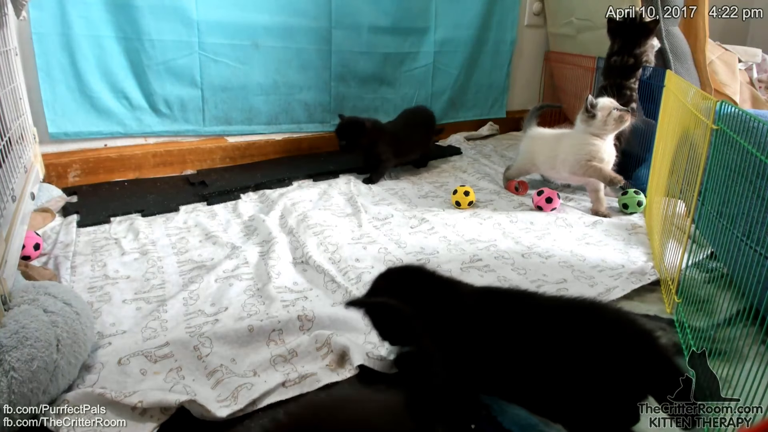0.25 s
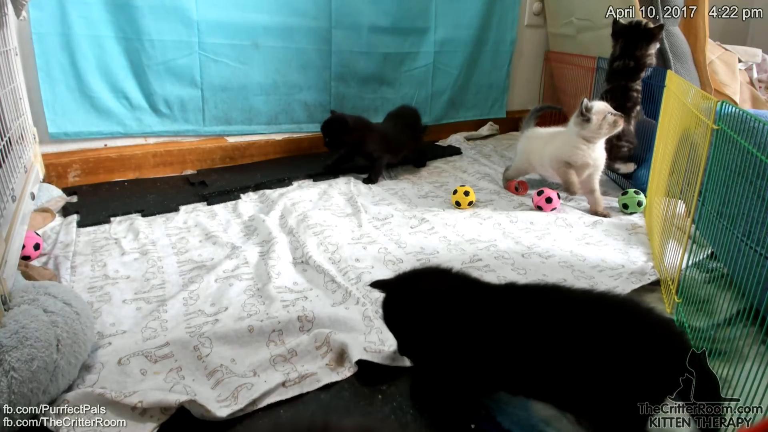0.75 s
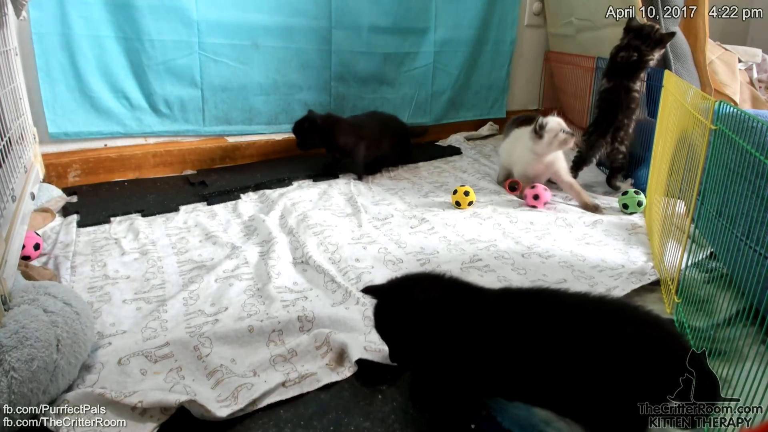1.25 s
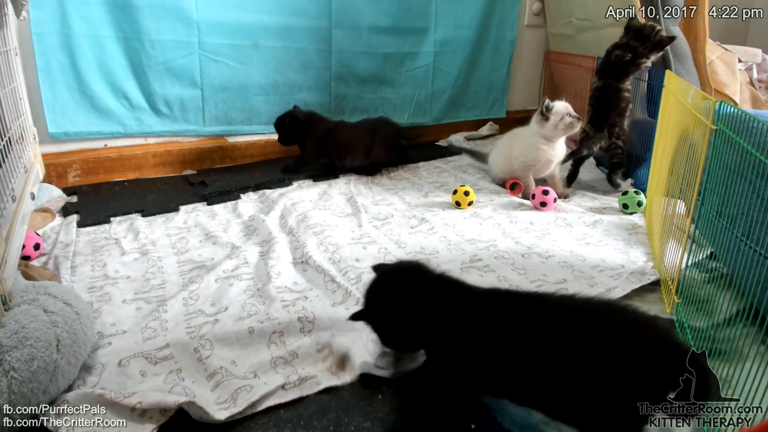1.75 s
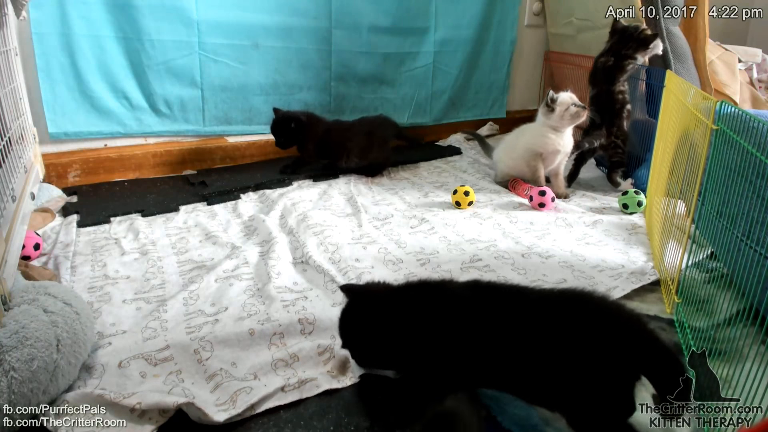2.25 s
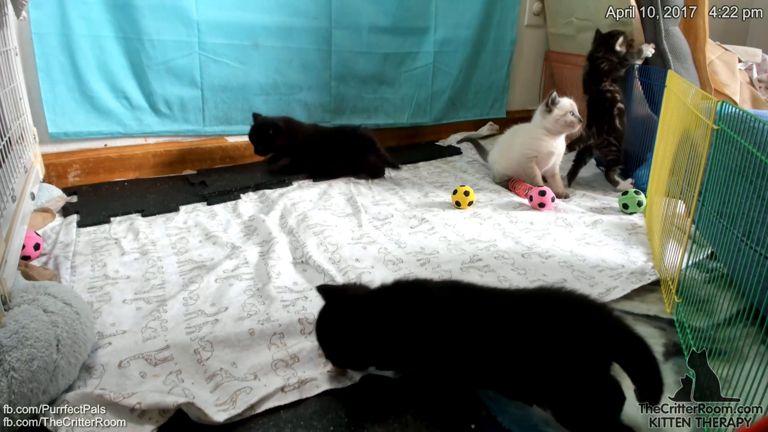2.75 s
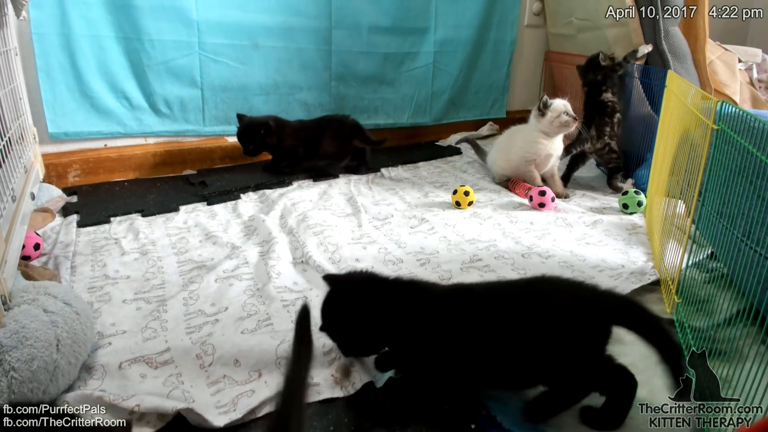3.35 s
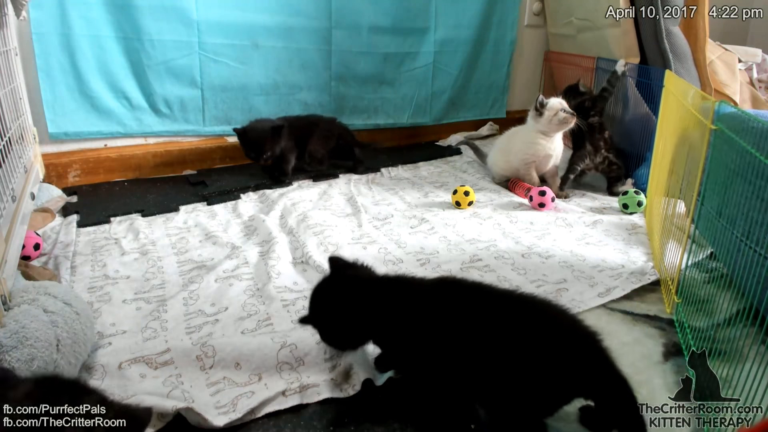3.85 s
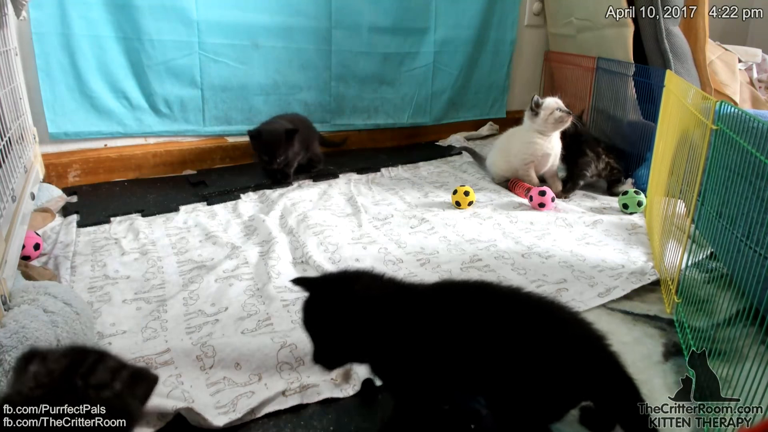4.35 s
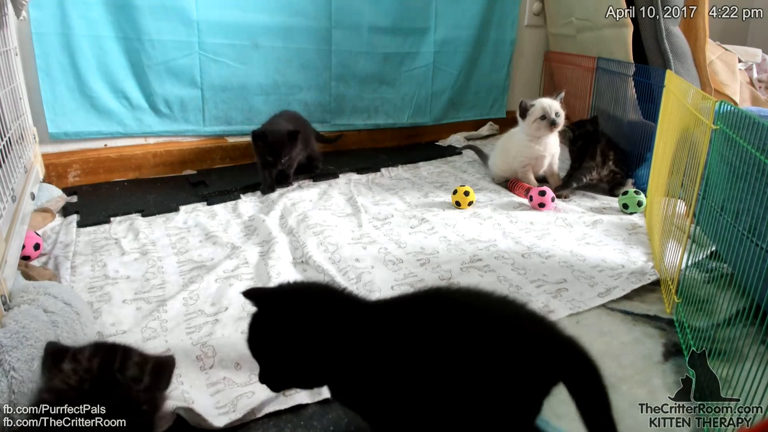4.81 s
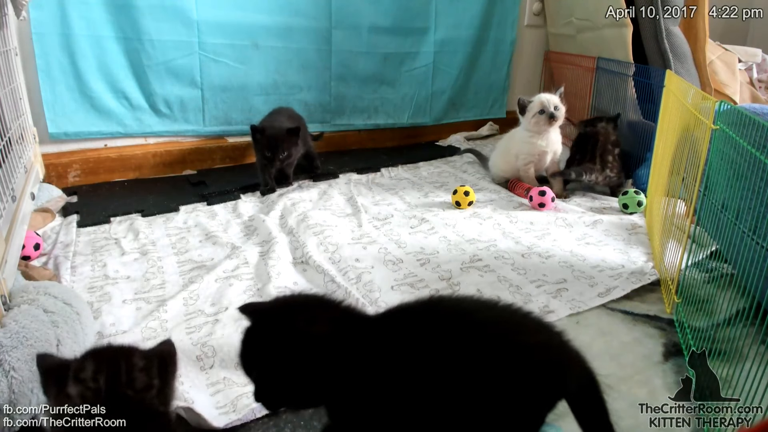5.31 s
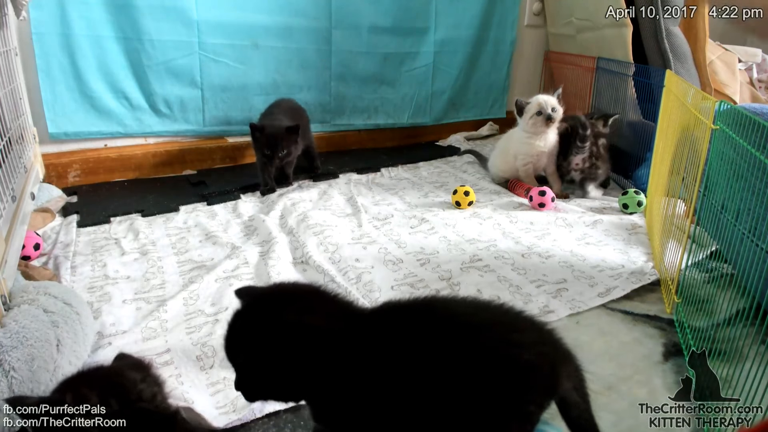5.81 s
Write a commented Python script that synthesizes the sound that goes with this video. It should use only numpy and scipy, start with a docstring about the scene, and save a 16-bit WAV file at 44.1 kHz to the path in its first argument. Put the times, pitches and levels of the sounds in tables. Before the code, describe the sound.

Kittens move about on a blanket over foam floor mats in a small room, heard close from floor level. Soft pats lead to one heavy, boomy thud before the first second ends. Crisp claw ticks follow around two and three seconds, then thumps and cloth scuffles crowd together before thinning to sparse steps. Low hum, rumble and light hiss continue underneath.

```python
"""Kittens pad and scuffle on a blanket over foam mats in a small room, close to a microphone on the floor.
Over a hum, rumble and hiss, soft pats lead to the heaviest thud near 0.8 s: damped swings that ring the boards.
Sharp claw ticks, at 2.2 and 3.1 s, and rasps are resonant noise; cloth and fur drag as swelling bands of noise.
Pats and thuds crowd from 3.2 to 4.9 s, a faint whirr comes up at 4.5 s, and sparser steps last to the end.
A widener spreads the one channel by a near quarter-cycle lag, a crossed echo and a bass shared by both sides."""
import sys
import numpy as np
from scipy import signal
from scipy.fft import rfft, irfft, next_fast_len
from scipy.io import wavfile
from scipy.ndimage import uniform_filter1d

SR = 44100
rng = np.random.default_rng(int(sys.argv[2]) if len(sys.argv) > 2 else 0)


def waveform_to_disk(signal):
    """Save audio, clipped to [-1, 1], as 16-bit WAV at the path in sys.argv[1]."""
    frames = np.transpose(np.atleast_2d(signal))
    scaled = np.clip(frames, -1, 1) * 32767
    samples = np.round(scaled).astype(np.int16)
    wavfile.write(sys.argv[1], SR, samples)


N = 267731


def undb(db):
    """Logarithmic level: 20 dB is a factor of ten in amplitude."""
    return 10 ** (np.asarray(db) / 20)


def level(x, db):
    """Root-mean-square level: scale the whole signal to it."""
    return x * undb(db) / np.sqrt(np.mean(x ** 2))


def band(x, hz, width):
    """Simple resonance: a two-pole filter with gain 1 at its centre."""
    return signal.lfilter(*signal.iirpeak(hz, hz / width, fs=SR), x)


def steep_band(x, hz, width):
    """Cascaded resonance: two equal passes steepen the skirts."""
    return band(band(x, hz, width), hz, width)


def body(force, modes):
    """Modal superposition: neighbouring modes have opposite signs, so the valleys between them stay dark."""
    out = 0
    for k, (hz, width, db) in enumerate(modes):
        sign = (-1) ** k
        out = out + sign * undb(db) * steep_band(force, hz, width)
    return out


def add(out, s, db, x):
    """Linear superposition: lay a sound with the given peak level into the track."""
    i = int(s * SR)
    x = x[:N - i]
    out[i:i + len(x)] += undb(db) * x / np.abs(x).max()


def walk(rate):
    """Random modulation: levels held for 1 / rate seconds, then smoothed twice over that time."""
    hold = int(SR / rate)
    steps = np.repeat(rng.standard_normal(N // hold + 1), hold)
    smooth = uniform_filter1d(uniform_filter1d(steps, hold), hold)
    return 0.75 * smooth[:N]


def coloured(points, db):
    """Spectral shaping: white noise is filtered along a curve drawn over log frequency."""
    hz, shape_db = np.transpose(points)
    f = np.maximum(np.fft.rfftfreq(N, 1 / SR), 1)
    gain = undb(np.interp(np.log(f), np.log(hz), shape_db))
    return level(irfft(rfft(rng.standard_normal(N)) * gain, N), db)


# weight landing on the floor: start_s [s], level_db [peak dB], pitch_hz of the give [Hz]
THUDS = [(0.347, -40, 94.5), (0.369, -38, 156), (0.746, -22, 125), (.75, -34, 227), (0.764, -13, 97.3),
         (.772, -20, 168.3), (1.099, -31, 137), (1.129, -34.5, 83), (1.381, -32.5, 67), (1.391, -36, 143),
         (2.447, -33, 100), (2.555, -36.5, 125), (3.245, -39.5, 170), (3.277, -27, 105.3),
         (3.303, -29.5, 63), (3.359, -37, 39.3), (3.543, -26, 129.7), (3.552, -35.5, 198), (3.583, -34, 70),
         (3.656, -32, 110.6), (4.015, -28.5, 104), (4.099, -36.5, 151), (4.204, -35.5, 137),
         (4.314, -27, 93.4), (4.776, -33.5, 99), (4.865, -34, 149), (5.066, -29.5, 93.3),
         (5.451, -38, 140.5), (5.677, -33.5, 126), (5.686, -33, 240), (5.765, -37, 145),
         (6.028, -31.5, 113)]
# modes of the floor boards: pitch_hz [Hz], level_db [dB], decay_s to -60 dB [s]
BOARDS = [(38, 4.5, 0.12), (61.4, -22, 0.79), (91, 8, 0.58), (125, 8, 0.23), (156.6, 13.5, 0.25),
          (173.7, 9, 0.98), (220, -3, 0.52)]


def thuds(cycles=1.734, lead_s=0.0068):
    """Forced vibration: the foam's short swing drives the boards, and those nearest its pitch ring on."""
    out, t = np.zeros(N), np.arange(SR // 2) / SR
    ring_gain = 2 * undb(-6)
    for s, db, hz in THUDS:
        # the swing swells and fades over twice this many cycles
        swell = np.sin(np.pi * np.minimum(t * hz / cycles / 2, 1)) ** 2
        give = np.sin(2 * np.pi * hz * t) * swell
        ring = 0
        for board_hz, board_db, t60 in BOARDS:
            width = np.log(1000) / np.pi / t60
            ring = ring + undb(board_db) * band(give, board_hz, width)
        add(out, s - lead_s, db, give + ring_gain * ring)  # the foam gives a moment early
    return out


def strikes(table, crackle_db, crackle_t60_s, modes, soft_hz):
    """Impact excitation: a snap and a dying crackle ring one body, favouring modes near each spot's pitch."""
    out, t = np.zeros(N), np.arange(SR // 4) / SR
    contact = signal.butter(2, soft_hz, fs=SR, output="sos")
    for s, db, spot_hz, focus in table:
        crackle = rng.standard_normal(len(t)) * undb(crackle_db - 60 * t / crackle_t60_s)
        snap = t == 0
        force = signal.sosfilt(contact, snap + crackle)  # the contact takes time
        spot = [(hz, width, g - focus * np.log2(hz / spot_hz) ** 2) for hz, width, g in modes]
        add(out, s, db, body(force, spot))
    return out


# paws on the mats: start_s [s], level_db [peak dB], pitch_hz favoured [Hz], focus [dB per octave squared]
PATS = [(.169, -58, 1200, 8), (.213, -52, 900, 5), (.308, -52.5, 1210, 6), (.358, -47, 400, 2.5),
        (.39, -51, 800, 2.5), (.642, -52.5, 893, 3), (.7445, -32, 690, 5.5), (.978, -58, 600, 5),
        (1.088, -71, 900, 2), (1.115, -50, 890, -0.5), (1.353, -56, 500, 5), (1.655, -51.5, 400, 5),
        (1.958, -60, 905, 1), (2.63, -56, 1190, 1), (2.98, -45.5, 503, 0), (3.246, -38.5, 447, 4),
        (3.296, -40.5, 545, 2.5), (3.551, -31.5, 580, 2.5), (3.988, -44, 500, 2.5), (4.047, -44, 493, 1.5),
        (4.201, -40.5, 510, 5), (4.282, -47, 493, 2), (4.308, -50, 497, 3), (4.341, -40.5, 448, 2),
        (4.576, -50.5, 930, 3), (4.692, -50, 600, -0.5), (4.851, -49, 800, 6), (4.868, -54, 900, 4),
        (4.94, -57, 700, 1), (5.053, -51, 497, 2.5), (5.085, -48, 397, 2), (5.441, -48.5, 600, 2),
        (5.474, -47.5, 800, 4), (5.665, -48.5, 500, 6), (5.684, -50, 400, 2), (5.747, -48, 900, 3.5),
        (6.04, -51.5, 300, 8)]
# resonances of a mat, before the focus: pitch_hz [Hz], width_hz of each pass [Hz], level_db [dB]
MAT = [(178, 55, 16), (240, 38, 14), (300, 78, 4.5), (448, 153, -4.5), (590.5, 162, -5.5),
       (800, 180, -11.5), (1095, 280, -9), (1604, 350, -12), (2650, 350, -0.5), (3660, 620, -21)]


def pats():
    """Soft impact: a long contact low-passes the force that rings the mat."""
    return strikes(PATS, crackle_db=-31, crackle_t60_s=0.06, modes=MAT, soft_hz=1800)


# claws catching and letting go: start_s [s], level_db [peak dB before the bounce],
# pitch_hz favoured [Hz], focus [dB per octave squared]
TICKS = [(.2145, -52, 3980, 10), (.309, -48.5, 2500, 8), (.463, -50.5, 2700, 18), (.544, -52, 6000, 5),
         (.643, -49, 2420, 0), (.7455, -47, 2600, 18), (.978, -51, 5000, 0), (1.1175, -43.5, 5900, 2.5),
         (2.1797, -22, 3320, 0.5), (2.1803, -27.5, 3070, 24), (2.267, -46, 3000, 12), (2.358, -51, 5900, 2),
         (2.508, -49, 4900, 18), (2.582, -47.5, 4400, 22), (2.992, -44, 2200, 7), (3.008, -47, 2600, 1),
         (3.045, -41, 4500, 6), (3.0625, -17, 6500, 0), (3.105, -52, 5500, 4), (3.295, -42.5, 5500, 0.5),
         (3.451, -48, 6900, 0), (3.544, -37, 7050, 1.5), (3.551, -42, 2500, -0.5), (3.615, -48, 7600, 10),
         (3.628, -45, 7500, 4), (3.9875, -50.5, 4000, 12), (4.0565, -38.5, 8900, 21), (4.202, -49, 2400, 5),
         (4.283, -43.5, 4950, 5), (4.295, -43, 6460, -3), (4.309, -43, 6000, 2), (4.852, -47.5, 5670, 10),
         (5.442, -48.5, 5000, 9), (5.475, -48, 4000, 5), (5.665, -50, 4500, 5)]
# resonances of a claw, before the focus: pitch_hz [Hz], width_hz of each pass [Hz], level_db [dB]
CLAW = [(1110, 310, -5.5), (1740, 250, -8.5), (2490, 690, 3.5), (3260, 650, -5.5), (4000, 710, 1),
        (4930, 1470, 1.5), (6360, 3600, -3.5), (8100, 2000, 3), (9600, 1240, -5), (14000, 10000, -15)]
BOUNCE_S, BOUNCE_DB = 0.001385, -16.5


def ticks():
    """Hard impact and early reflection: bright ticks come again off the nearest wall of the pen."""
    direct = strikes(TICKS, crackle_db=-28, crackle_t60_s=0.043, modes=CLAW, soft_hz=16100)
    return direct + undb(BOUNCE_DB) * np.roll(direct, int(BOUNCE_S * SR))


# fur and cloth dragging: start_s [s], length_s [s], level_db [rms dB before swell and grain], pitch_hz [Hz]
DRAGS = [(0.261, 0.16, -71, 600), (0.377, 0.051, -70, 4970), (0.641, 0.18, -67, 4530),
         (0.63, 0.066, -64.5, 1190), (0.758, 0.16, -65.5, 4630), (.76, 0.11, -63.5, 400),
         (1.077, 0.11, -66.5, 5440), (1.08, 0.085, -62.5, 590), (1.262, 0.039, -67.5, 4480),
         (1.343, 0.1, -66, 430), (1.653, 0.036, -68.5, 800), (1.941, 0.065, -68.5, 4440),
         (1.946, 0.054, -68, 1210), (2.183, 0.077, -61, 5470), (2.341, 0.066, -65.5, 4970),
         (2.41, 0.045, -68, 5000), (2.729, 0.086, -59, 4900), (2.99, 0.07, -62.5, 5030),
         (3.285, 0.077, -59, 447), (3.284, 0.075, -64.5, 5060), (3.543, 0.12, -59.5, 900),
         (3.585, 0.092, -63, 6500), (3.977, 0.29, -67, 610), (4.044, 0.065, -64, 8100),
         (4.193, 0.16, -60, 590), (4.306, 0.12, -59.5, 3450), (4.309, 0.078, -55, 486),
         (4.391, 0.2, -62.5, 5240), (4.477, 0.19, -57, 4930), (4.488, 0.22, -65, 870),
         (4.654, 0.07, -61.5, 4000), (4.666, 0.075, -66, 730), (4.812, 0.13, -70, 700),
         (5.041, 0.12, -74, 600), (5.063, 0.1, -69, 6460), (5.434, 0.1, -67.5, 474),
         (5.666, 0.21, -70, 493), (6.009, 0.083, -82, 700)]
RISE_SHARE, DRAG_WIDTH = 0.2, 1.67  # part of a stroke spent swelling; bandwidth over centre


def drags(patchy_db=3.5):
    """Friction noise: fibres slip in dense uneven grains that swell and fade with each stroke."""
    out, t = np.zeros(N), np.arange(SR // 2) / SR
    grain = undb(patchy_db * walk(120))
    for s, length, db, hz in DRAGS:
        ramp = np.interp(t / length, [0, RISE_SHARE, 1], [0, 1, 0])
        stroke = np.sin(np.pi / 2 * ramp) ** 2
        noise = rng.standard_normal(len(t))
        slip = level(steep_band(noise, hz, DRAG_WIDTH * hz), db) * stroke
        i = int(s * SR)
        out[i:i + len(t)] += slip[:N - i]
    return out * grain


# a claw pulled along a thread or wire: start_s [s], level_db [rms dB before the decay],
# pitch_hz [Hz], width_hz of each pass [Hz], decay_s to -60 dB [s]
RASPS = [(2.179, -50.5, 3300, 700, 0.17), (2.99, -54, 2440, 1300, .35), (5.679, -53, 980, 400, 0.075)]


def rasps():
    """Resonant friction: a scrape held in one resonance starts at once and dies away."""
    out, t = np.zeros(N), np.arange(N) / SR
    for s, db, hz, width, t60 in RASPS:
        scrape = level(steep_band(rng.standard_normal(N), hz, width), db)
        decay = undb(-60 * np.abs(t - s) / t60) * (t > s)
        out += scrape * decay
    return out


def room(near, level_db=-17, t60_s=0.38):
    """Reverberation by convolution: the walls answer after 4 ms and die fast among the soft things."""
    t = np.arange(SR // 2) / SR
    walls = rng.standard_normal(len(t)) * undb(-60 * t / t60_s) * (t > .004)
    walls = undb(level_db) * walls / np.sqrt(np.sum(walls ** 2))
    return signal.fftconvolve(near, walls)[:N]


# a motor and the mains buzz: pitch_hz [Hz], level_db [rms dB before the waver], waver_db [dB per unit of walk]
HUM = [(45.25, -44, 0.15), (120.56, -50.5, 1.5)]


def hum():
    """Amplitude modulation: two tones of fixed pitch, a motor and the mains buzz, waver in level."""
    out, t = np.zeros(N), np.arange(N) / SR
    for hz, db, waver_db in HUM:
        amplitude = np.sqrt(2) * undb(db + waver_db * walk(5.0))
        out += amplitude * np.sin(2 * np.pi * (hz * t + rng.random()))
    return out


# spectrum of the house's rumble: pitch_hz [Hz], level_db [relative dB per Hz]
RUMBLE = [(10, -18), (25, -22), (38, -6.5), (62, -3), (95, -3.5), (112, -4.5), (126, 4.5), (140, -7),
          (160, -8.5), (200, -25), (260, -31.5), (500, -40.5), (1500, -100)]
# spectrum of the microphone's hiss: pitch_hz [Hz], level_db [relative dB per Hz]
HISS = [(100, 8.5), (1000, 2.5), (3000, -1.5), (8000, 0.5), (14000, -4.5), (16500, -12.5)]


def air(swell_db=0.5):
    """Stationary and modulated noise: the house's rumble wavers slightly, the microphone's hiss stays smooth."""
    rumble = coloured(RUMBLE, -46) * undb(swell_db * walk(10))
    return rumble + coloured(HISS, -68.5)


def whirr(start_s=4.5, swell_s=.6, level_db=-77, pitch_hz=1700, width_hz=900):
    """Band-limited noise: a faint distant whirr swells to its level and stays."""
    noise = level(steep_band(rng.standard_normal(N), pitch_hz, width_hz), level_db)
    return noise * np.clip((np.arange(N) / SR - start_s) / swell_s, 0, 1)


def scene():
    """Superposition: contacts with their reverberation, then thuds and background, alike in two channels."""
    near = pats() + ticks() + drags() + rasps()
    mono = thuds() + near + room(near) + hum() + air() + whirr()
    return np.tile(mono, (2, 1))


# the widener's phase shift: pitch_hz [Hz], lag_rad of the right behind the left [radians]
SHIFT = [(100, 1.44), (6000, 1.44), (8500, 1.33), (11500, .98), (14500, .65), (20000, .1)]
ECHO_S, ECHO_GAIN = .027, .39
BASS_HZ, BASS_RAD, BASS_LATE = 105, -1.59, 2.35  # crossover; phase there; further lag in radians per log Hz
SMEAR_CYCLES, TOP_HZ = .6, 16000


def record(dry):
    """Phase decorrelation: the widener sets the sides apart, then a steep low-pass cuts the top."""
    size = next_fast_len(N + SR)
    f = np.maximum(np.fft.rfftfreq(size, 1 / SR), 20)
    lag = np.exp(-1j * np.interp(f, *np.transpose(SHIFT)))
    echo = ECHO_GAIN * np.exp(-2j * np.pi * f * ECHO_S)
    # the bass goes alike to both sides, later the lower it is
    steep = (BASS_HZ / f) ** 3
    bass = steep * np.exp(1j * (BASS_RAD - BASS_LATE * np.log(f / BASS_HZ)))
    # phase shifters hold every tone back by a part of its own cycle
    smear = np.exp(-2j * np.pi * SMEAR_CYCLES * np.log(f / TOP_HZ))
    left = bass + 1 + echo * lag
    right = bass + lag + echo
    sides = np.array([left, right]) * smear / (1 + steep)
    lead = SR // 4  # a mirrored lead-in, so the sound is already running at the start
    padded = np.pad(dry, ((0, 0), (lead, 0)), "reflect")
    wide = irfft(rfft(padded, size) * sides, size)[:, lead:lead + N]
    return signal.sosfilt(signal.ellip(8, .2, 60, TOP_HZ, fs=SR, output="sos"), wide)


dry = scene()
out = record(dry)
waveform_to_disk(out)
```